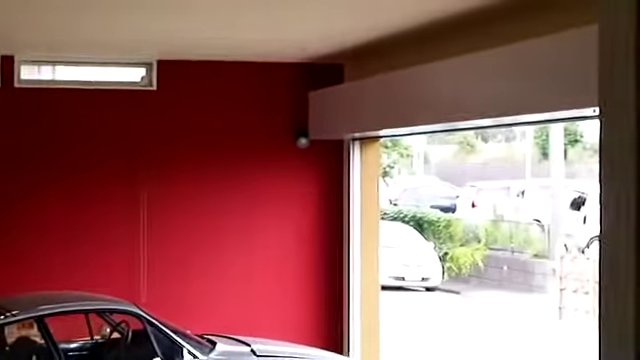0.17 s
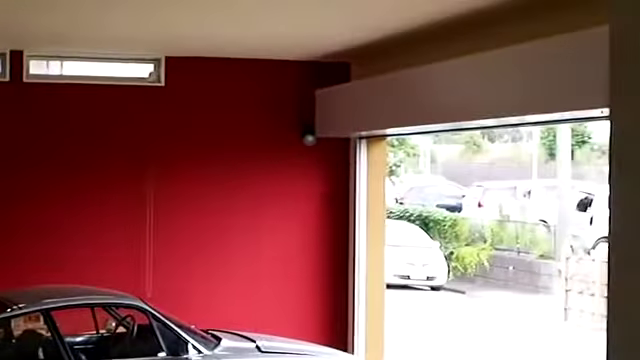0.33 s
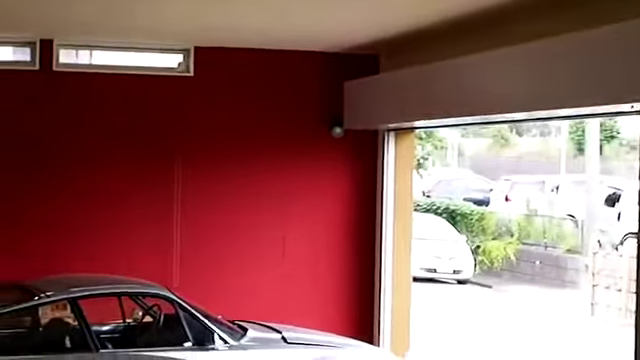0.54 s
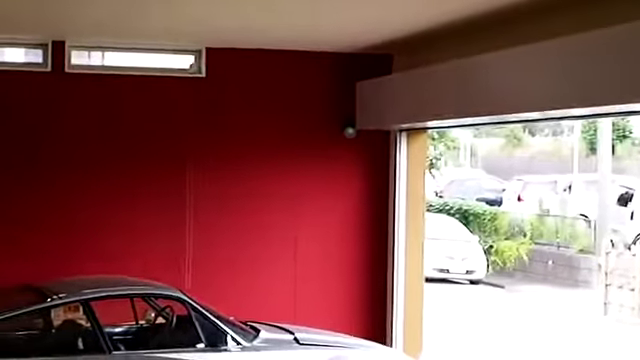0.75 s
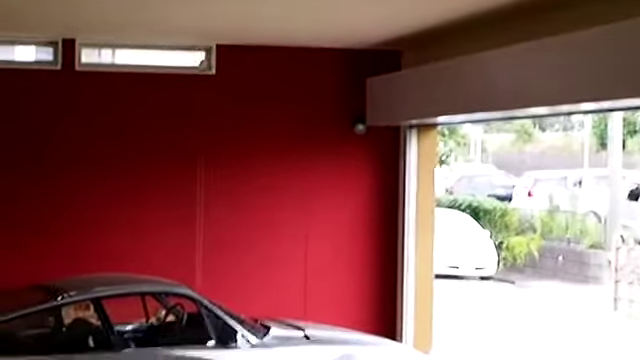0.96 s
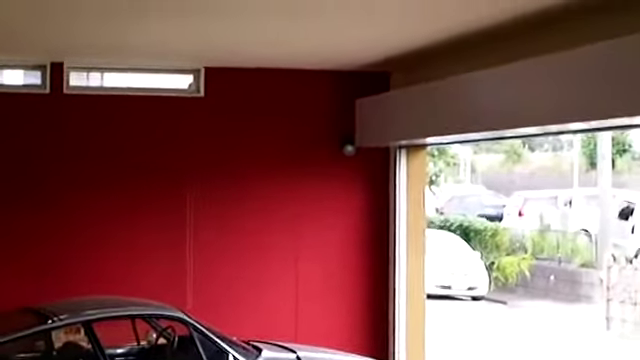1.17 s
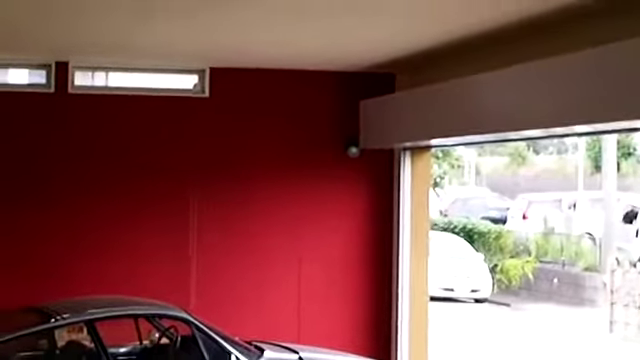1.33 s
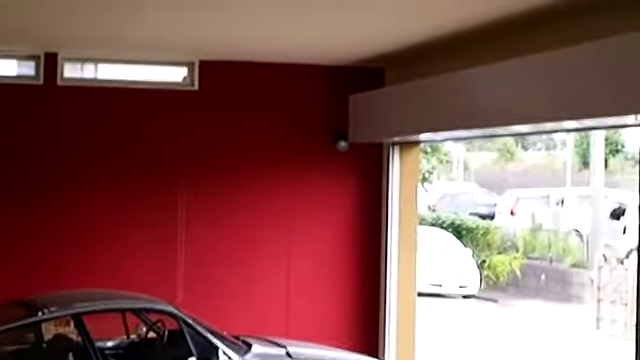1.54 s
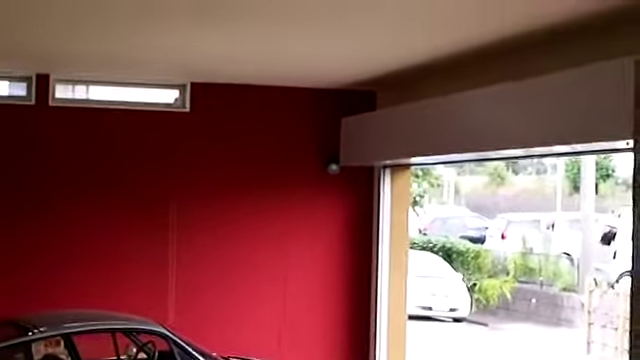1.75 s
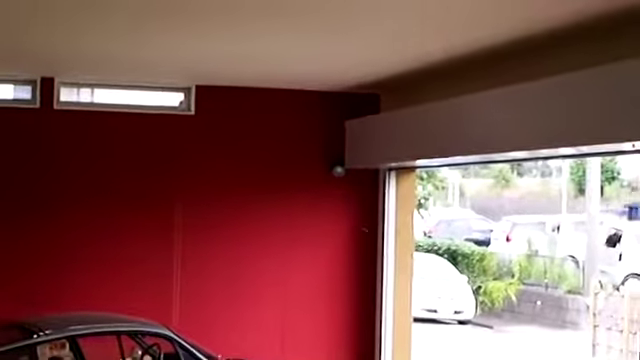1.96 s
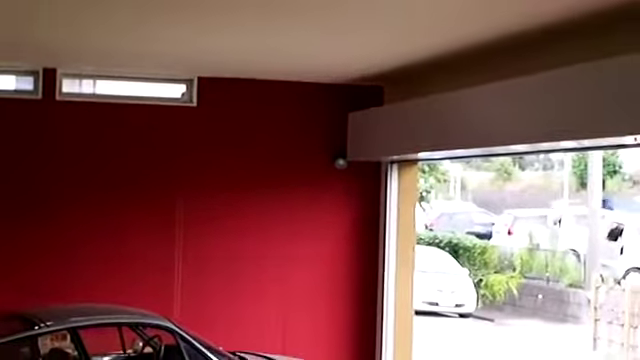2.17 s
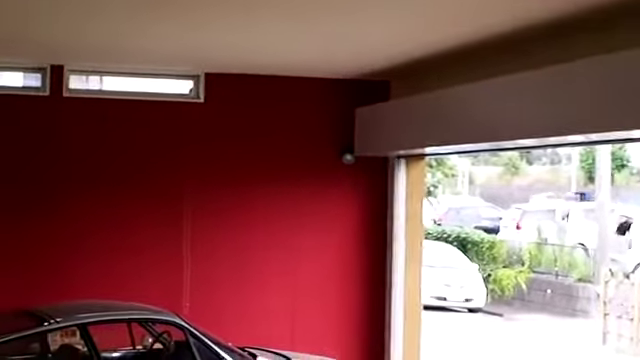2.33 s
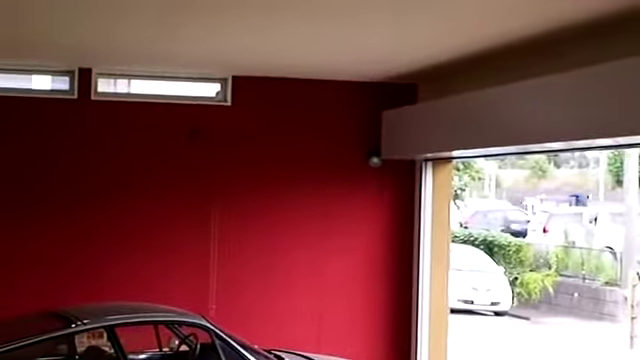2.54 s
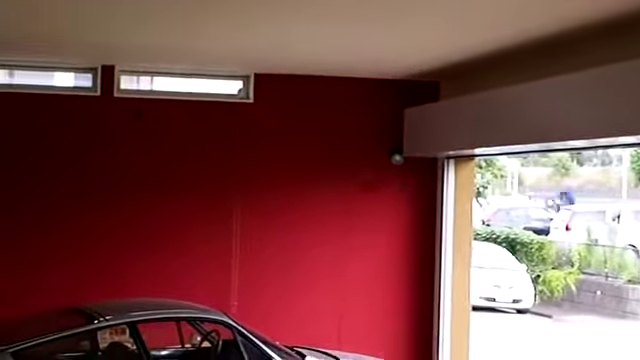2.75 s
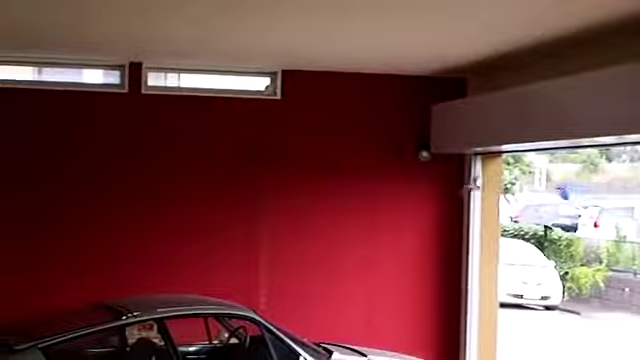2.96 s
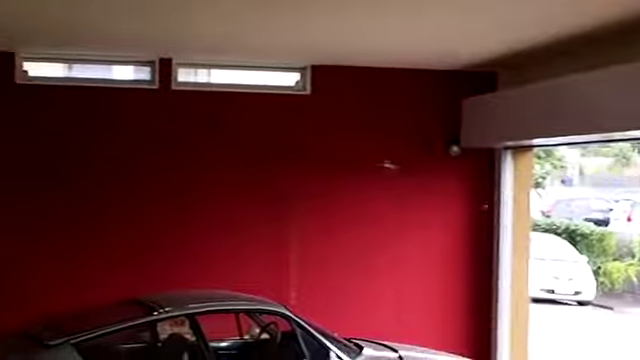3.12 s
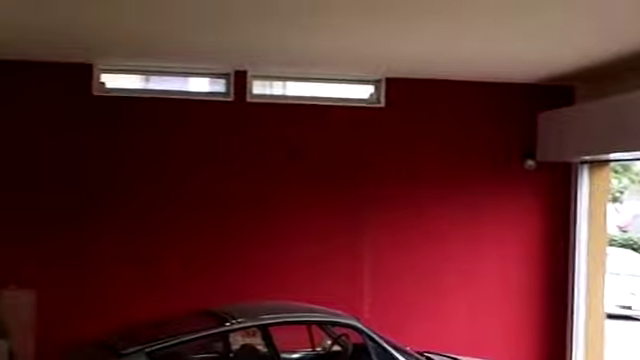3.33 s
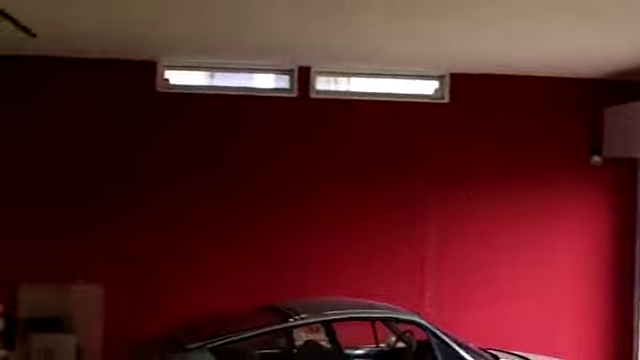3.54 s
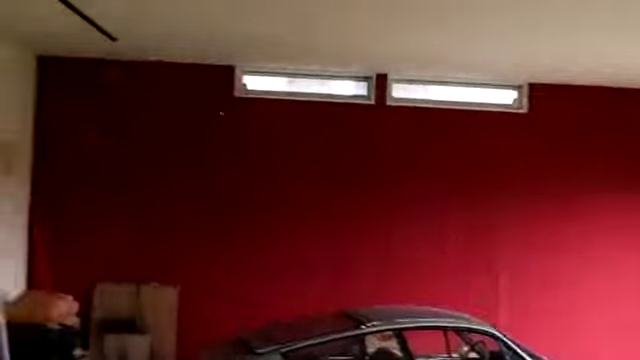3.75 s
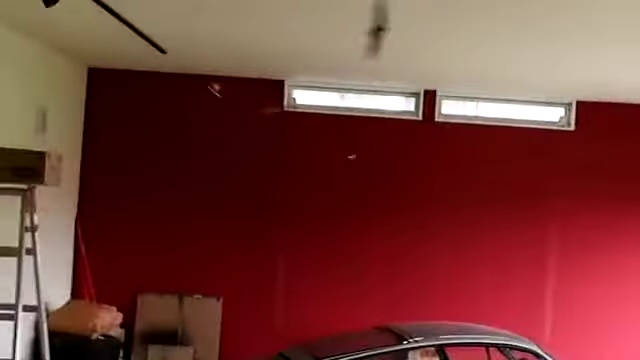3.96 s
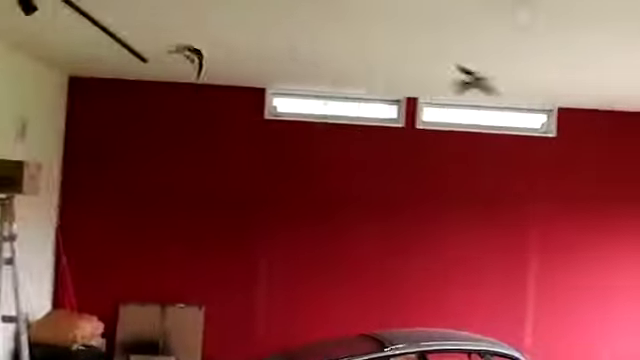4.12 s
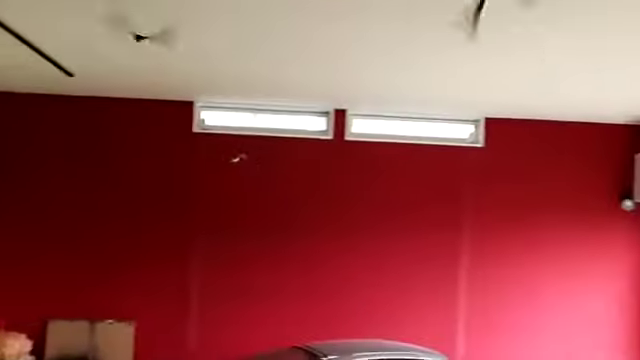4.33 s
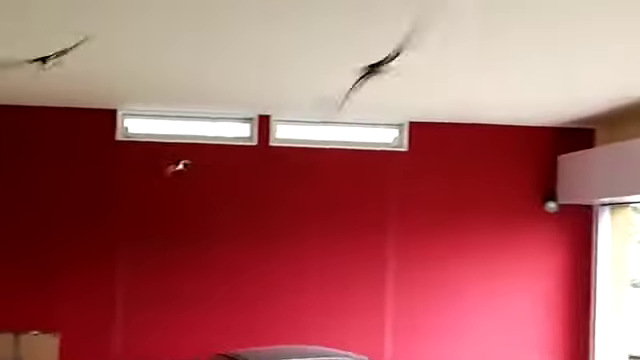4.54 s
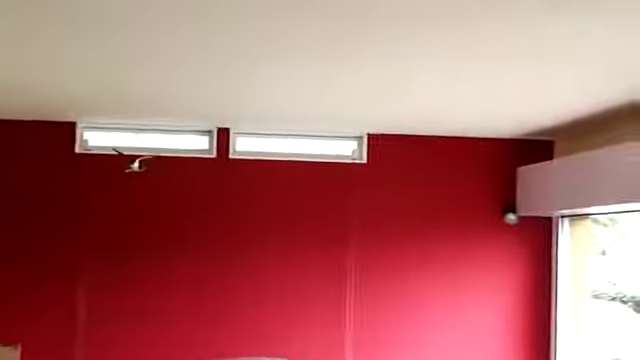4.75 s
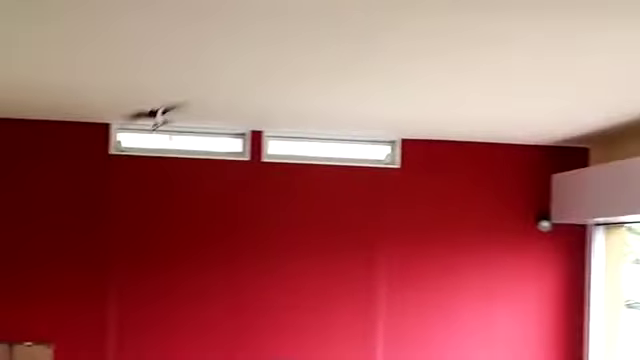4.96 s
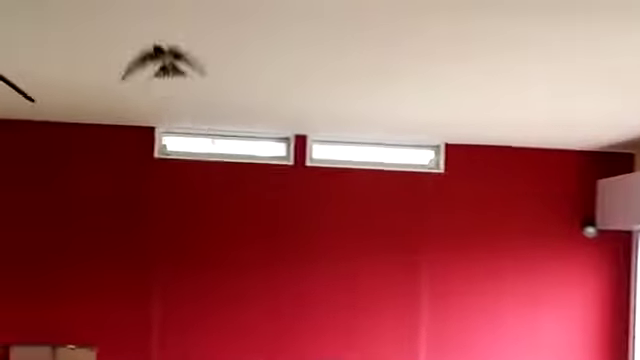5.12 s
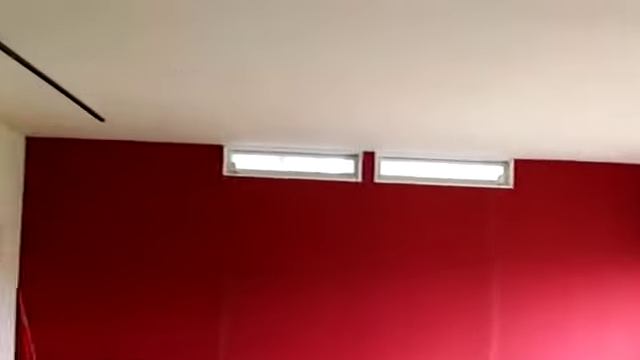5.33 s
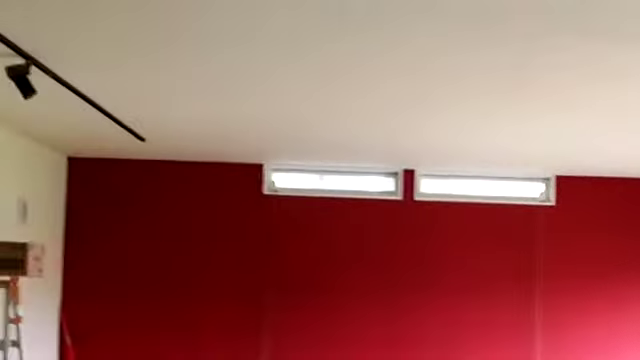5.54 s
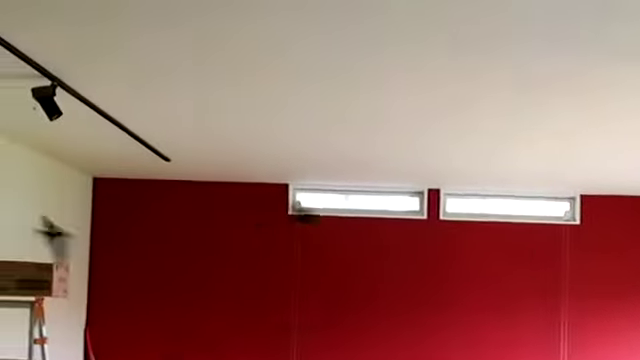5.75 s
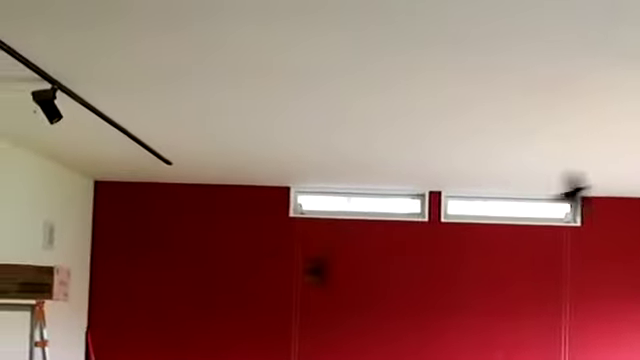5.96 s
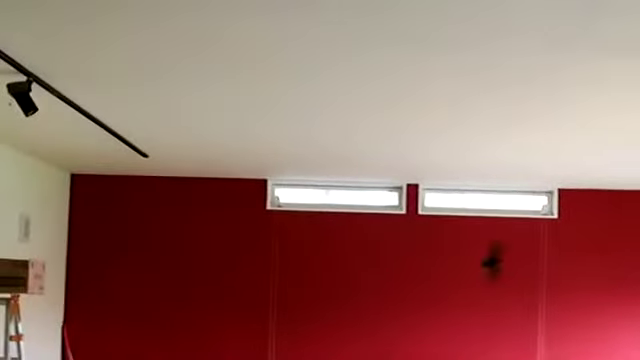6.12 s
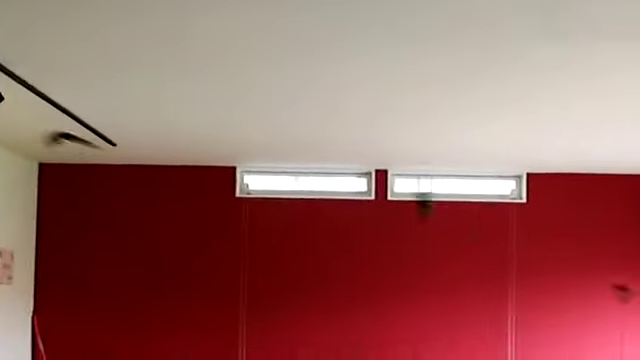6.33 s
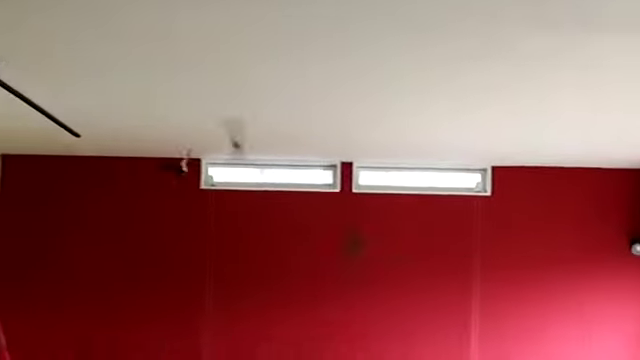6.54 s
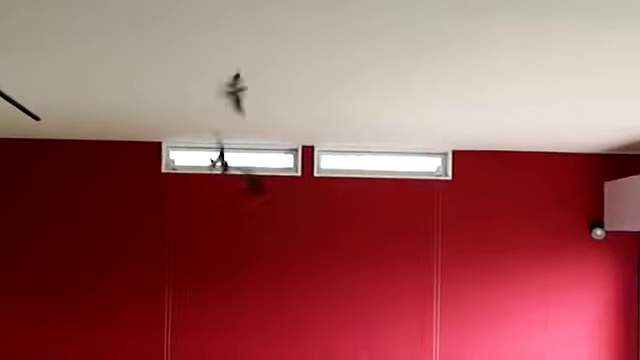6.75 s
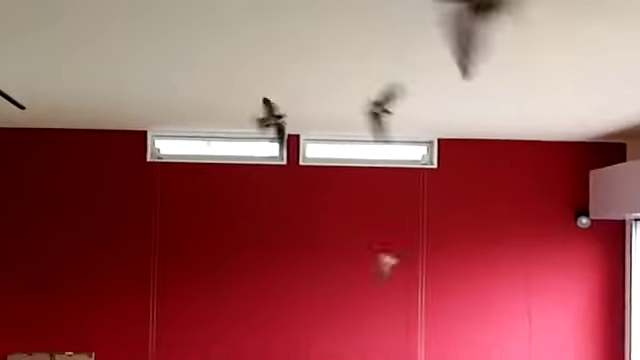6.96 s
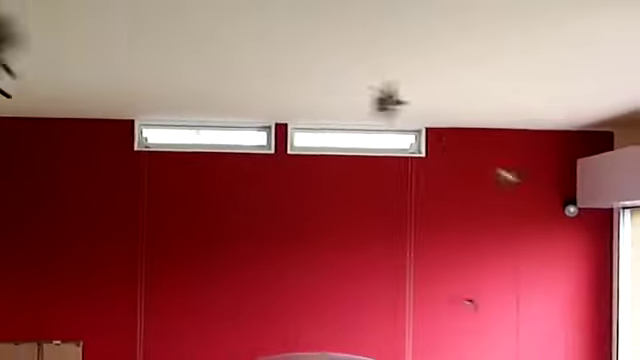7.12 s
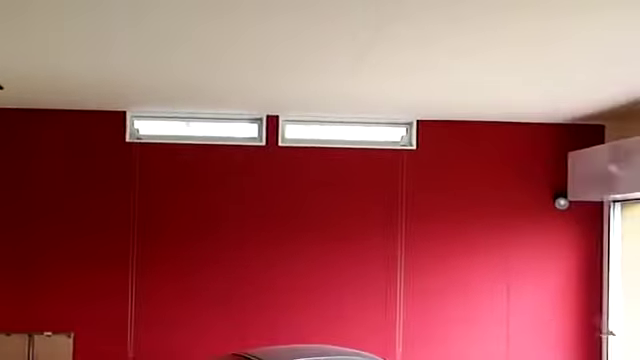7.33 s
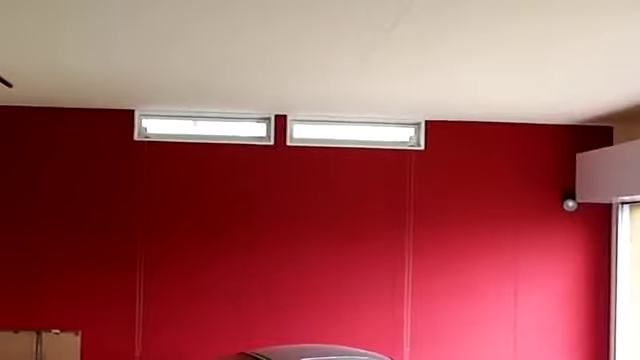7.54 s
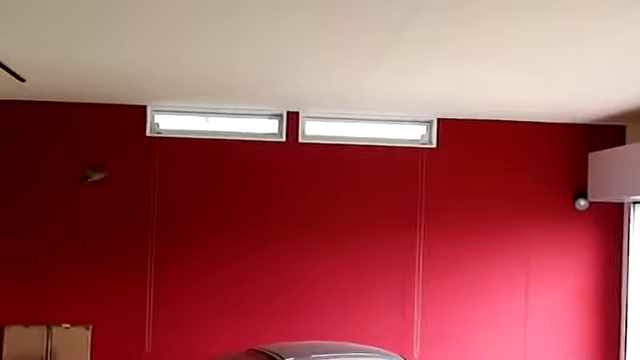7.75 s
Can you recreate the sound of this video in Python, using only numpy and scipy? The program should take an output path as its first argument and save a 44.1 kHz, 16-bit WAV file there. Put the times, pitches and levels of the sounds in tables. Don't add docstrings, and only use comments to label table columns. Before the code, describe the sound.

Swallows twitter in a bare, echoing garage, faint chirps building to piercing whistles over soft street rumble and an idling engine outside.

```python
import sys
import numpy as np
from scipy import signal
from scipy.fft import rfft, irfft, next_fast_len
from scipy.io import wavfile
from scipy.ndimage import uniform_filter1d

SR = 44100
rng = np.random.default_rng(int(sys.argv[2]) if len(sys.argv) > 2 else 0)


def invert_db(level):
    return 10 ** (np.asarray(level, dtype=float) / 20)


def output_pcm(signal):
    pcm = np.clip(np.atleast_2d(signal).T, -1, 1) * 32767
    wavfile.write(sys.argv[1], SR, np.round(pcm).astype(np.int16))


N = 343524

# share of length [0-1], share of rise [0-1], level_db
FLICK_GLIDE = [(0, 0, -6), (.33, .5, -1), (.66, .9, 0), (1, 1, -15)]


def swallows():
    return chirps() + slurs() + cries() + whistles()


def chirps():
    # start_s, length_s, first_pitch_hz, top_pitch_hz, level_db
    chirp_calls = [(0.0, 0.013, 3310, 4310, -37.5), (0.43, 0.065, 3040, 4240, -43),
                   (1.875, 0.047, 3115, 4760, -37.5), (2.365, .045, 3240, 4710, -34.5),
                   (3.035, 0.058, 3060, 4580, -30), (3.33, .06, 2846, 4233, -28),
                   (3.59, 0.06, 2980, 4635, -21.5), (4.608, .056, 2837, 4330, -24.5),
                   (5.07, .05, 3030, 4640, -24.5), (5.225, 0.049, 3037, 4464, -20.5),
                   (5.775, 0.051, 3046, 4620, -22.5), (6.15, 0.068, 3260, 4700, -23.5),
                   (6.65, 0.028, 3880, 4290, -35.5)]
    # start_s, length_s, first_pitch_hz, top_pitch_hz, level_db
    flick_calls = [
        (3.687, 0.023, 4570, 5510, -18),
        (7.132, 0.0346, 3850, 4520, -22.5),
    ]
    # share of length [0-1], share of rise [0-1], level_db
    chirp_glide = [(0, 0, -13), (.38, .45, -3), (.75, .93, 0), (1, 1, -14)]
    # wobble [1/500 of pitch], step below [dB], step above [dB], rasp_db
    chirp_voice = (4.5, -1.5, -13, -17.5)
    flick_voice = (5, -14, -13.5, -10)
    notes = placed(chirp_voice, calls(chirp_calls, chirp_glide))
    notes += placed(flick_voice, calls(flick_calls, FLICK_GLIDE))
    return sing(notes, order=3, low_voice=1.06)


def slurs():
    # start_s, length_s, first_pitch_hz, top_pitch_hz, level_db
    slur_calls = [(1.11, 0.058, 3615, 5540, -36), (1.99, 0.11, 3122, 5870, -31),
                  (2.495, 0.085, 3060, 5640, -26.5), (3.09, 0.077, 3300, 5554, -25),
                  (3.752, 0.1, 3000, 5504, -23), (4.16, 0.048, 4290, 6020, -22),
                  (4.755, .087, 4247, 5890, -25.5), (7.59, 0.088, 3350, 5590, -21)]
    # start_s, length_s, first_pitch_hz, top_pitch_hz, level_db
    snap_calls = [
        (4.361, 0.026, 4050, 5110, -23.5),
    ]
    # start_s, length_s, first_pitch_hz, top_pitch_hz, level_db
    far_calls = [
        (1.5, .15, 3805, 3840, -53.5),
        (1.72, 0.15, 3900, 4990, -55),
    ]
    # share of length [0-1], share of rise [0-1], level_db
    slur_glide = [(0, 0, -17), (.42, .33, -6), (.68, .52, -3), (.82, .95, 0), (1, 1, -5)]
    # wobble [1/500 of pitch], step below [dB], step above [dB], rasp_db
    slur_voice = (3, -7, -6, -13)
    far_voice = (15, 0, -3, 0)
    notes = placed(slur_voice, calls(slur_calls, slur_glide) + calls(snap_calls, FLICK_GLIDE))
    notes += placed(far_voice, calls(far_calls, FLICK_GLIDE))
    return sing(notes, order=4)


def cries():
    # time_s, pitch_hz, level_db
    cry_tracks = [
        [(4.055, 3450, -41.5), (4.09, 3576, -36.5), (4.13, 3923, -28.5), (4.16, 4047, -28.5), (4.19, 4530, -35)],
        [(4.322, 4100, -29), (4.345, 4404, -29.5), (4.362, 4720, -29.5), (4.368, 4600, -49)],
    ]
    # wobble [1/500 of pitch], step below [dB], step above [dB], rasp_db
    cry_voice = (3, -12, -1, -9)
    return sing(placed(cry_voice, cry_tracks), order=2)


def whistles():
    # time_s, pitch_hz, level_db
    whistle_tracks = [
        [(5.415, 3950, -22.5), (5.427, 5200, -9), (5.44, 5470, -17), (5.465, 5260, -19), (5.48, 5780, -10),
         (5.497, 5930, -17.5), (5.512, 5690, -29), (5.527, 4440, -17)],
        [(6.2, 4484, -12), (6.215, 4980, -13), (6.24, 5200, -16.5), (6.27, 5320, -20), (6.32, 5950, -17),
         (6.335, 6130, -30)],
        [(6.79, 3560, -25.5), (6.81, 4540, -19.5), (6.835, 4975, -17), (6.86, 5250, -11.5), (6.872, 5970, -19),
         (6.882, 5800, -25)],
        [(7.172, 4380, -16), (7.2, 5580, -13), (7.225, 5280, -16), (7.25, 5753, -6), (7.265, 5265, -14),
         (7.29, 3820, -14)],
    ]
    # start_s, length_s, first_pitch_hz, top_pitch_hz, level_db
    pip_calls = [
        (5.312, 0.046, 4050, 5630, -15.5),
        (6.168, 0.018, 5290, 5533, -7.5),
        (6.77, 0.0365, 3834, 5430, -13.5),
    ]
    # start_s, length_s, first_pitch_hz, top_pitch_hz, level_db
    high_calls = [
        (6.068, 0.037, 5770, 7530, -19),
        (6.68, .038, 5740, 6990, -14.5),
    ]
    low_calls = [
        (6.072, .03, 3060, 5370, -24),
        (6.675, .038, 3180, 4920, -26),
    ]
    # share of length [0-1], share of rise [0 first pitch, 1 top pitch, negative lower still], level_db
    pip_glide = [(0, 0, 1), (0.172, 0.77, -5.5), (.45, 1, 0), (1, 0.99, -39)]
    high_glide = [(0, -0.022, 3.5), (.27, 0.83, -13), (.58, 0.88, -21), (.82, .4, -10), (1, -0.48, 13.5)]
    low_glide = [(0, 1, -2), (.48, 0.81, -3.5), (.76, .55, -3), (1, 0, -1)]
    # wobble [1/500 of pitch], step below [dB], step above [dB], rasp_db
    pip_voice = (2, 0, -28, -22)
    whistle_voice = (4.5, 0, -24, -20)
    pips = calls(pip_calls, pip_glide) + calls(high_calls, high_glide) + calls(low_calls, low_glide)
    return sing(placed(pip_voice, pips) + placed(whistle_voice, whistle_tracks), order=1)


def calls(rows, glide):
    share, rise, db = np.transpose(glide)
    return [np.transpose([s + share * length_s, first_hz + rise * (top_hz - first_hz), level_db + db])
            for s, length_s, first_hz, top_hz, level_db in rows]


def placed(voice, tracks):
    # time_s, left minus right [dB], direct over room [dB], extra rasp [dB]
    flight = [(.3, 4, -3, -2), (1.2, 1, -7, -1), (2.0, 3, 1, -2), (2.5, 4, -2, -3), (3.1, 3, -1, 0),
              (3.35, 1, -1, -10), (3.6, 5, -4, 1), (3.75, 3, 2, -2), (4.2, 4, 2, 0), (4.6, 4.5, 5, -2),
              (4.8, 4, 1, 2), (5.1, 7, -6, -2), (5.45, 2, -3, 0), (5.8, 9, -7, -1), (6.2, 3, -2, 1),
              (6.8, 8, -5, -3), (7.2, 6, -2, 2), (7.6, 5, -2, -3)]
    s, pan_db, near_db, rasp_db = np.transpose(flight)
    wobble, below_db, above_db, voice_rasp_db = voice
    notes = []
    for track in tracks:
        pan, near, rasp = (np.interp(track[0][0], s, curve) for curve in (pan_db, near_db, rasp_db))
        notes.append(((wobble, below_db, above_db, voice_rasp_db + rasp), pan, near, track))
    return notes


def sing(notes, order, low_voice=1, room_pan_db=1.3):
    direct, wet = np.zeros((2, N)), np.zeros((2, N + 2 * SR))
    for (voice, pan_db, near_db, track), room in zip(notes, garage(count=len(notes))):
        at, x = note(voice, track, order, low_voice)
        ring = signal.fftconvolve(x[None], room, axes=1)
        wet[:, at:at + ring.shape[1]] += ring
        direct[:, at:at + len(x)] += x * invert_db(near_db + np.array([[pan_db], [-pan_db]]) / 2)
    direct = shape(direct, [(5000, 0.0), (10000, -3.0)])
    return direct + wet[:, :N] * invert_db(np.array([[room_pan_db], [-room_pan_db]]) / 2)


def note(voice, track, order, low_voice, shake_rad=0.98, flutter_db=3.2, fall=0.43):
    # frequency_hz, gain_db
    beak_colour = [(1500, -29), (2200, -16.5), (2700, -0.5), (4000, -1.5), (6000, 0.5), (8000, -3.5),
                   (11000, -14), (15000, -3)]
    # frequency_hz, gain_db
    air_colour = [(1800, -40), (2500, -8), (4500, -5), (6200, 5), (7500, 0), (11000, 2), (15000, 0)]
    wobble, below_db, above_db, rasp_db = voice
    s, hz, db = np.transpose(track)
    t = np.arange(int(s[0] * SR), int(s[-1] * SR)) / SR
    drift, shake, flutter = (walk(rate, size=SR // 6)[:len(t)] for rate in (200., 900., 150.))
    air = rng.standard_normal(SR // 6)[:len(t)]

    smooth_hz = uniform_filter1d(np.interp(t, s, hz), 200)
    pitch = smooth_hz / order * (1 + wobble / 500 * drift)
    phase = 2 * np.pi * np.cumsum(pitch) / SR + shake_rad * invert_db(rasp_db) * shake

    k = np.arange(1, 3 * order + 2)[:, None]
    step_db = np.where(k < order, below_db * (order - k), above_db * np.abs(k - order) ** fall)
    k = np.where(k < order, low_voice, 1) * k
    beak_hz, gain_db = np.transpose(beak_colour)
    beak_db = np.interp(np.log(k * pitch), np.log(beak_hz), gain_db)
    partials = invert_db(step_db + beak_db) * (k * pitch < 16000) * np.sin(k * phase)
    tone = np.sqrt(2) * np.sum(partials, axis=0)

    rasp = invert_db(rasp_db) * shape(air * (1 + np.cos(phase)), air_colour)
    rasp *= np.clip((t - t[0]) / 0.03, 0, 1)
    edge = np.clip(np.minimum(t - t[0], t[-1] - t) / .005, 0, 1)
    return int(s[0] * SR), (tone + rasp) * edge * invert_db(np.interp(t, s, db) + flutter_db * flutter)


def garage(count, onset_s=0.0039, echo_db=-12):
    # frequency_hz, t60_s
    decay_times = [(2500, 0.91), (5000, 0.79), (8000, 0.66), (12000, 0.52)]
    # delay_s, level_db, left minus right [dB]
    wall_echoes = [
        (0.009, -8, -32),
        (.024, -33, 13),
        (.037, -13, 3),
    ]
    t = np.arange(SR) / SR
    centres = 2000 * 2 ** np.arange(0, 3.1, .5)
    bands = []
    for hz in centres:
        edges = [hz / 2 ** .25, min(hz * 2 ** .25, 20000)]
        sos = signal.butter(2, edges, "band", fs=SR, output="sos")
        bands.append(signal.sosfilt(sos, rng.standard_normal((2, 2 * SR))))
    bands = np.array(bands)
    t60 = np.interp(centres, *np.transpose(decay_times))[:, None, None]
    fade = np.exp(-np.log(1000) * t / t60) * (1 - np.exp(-t / onset_s))
    for place in np.arange(count) * SR // count:
        tail = np.sum(bands[..., place:place + SR] * fade, axis=0)
        tail = stereo(*tail) / np.sqrt(np.sum(tail[0] ** 2))
        for s, db, pan_db in wall_echoes:
            tail[:, int(s * SR)] += invert_db(db + echo_db + np.array([pan_db, -pan_db]) / 2)
        yield tail


def ticks(decay_s=0.0012):
    # time_s, peak_db, centre_hz
    clicks = [
        (0.111, -29, 8000),
        (0.871, -27, 4120),
        (0.9, -27, 6360),
        (0.94, -36, 5000),
        (1.145, -32, 3000),
        (1.256, -34, 2760),
        (1.4, -34, 8000),
    ]
    out, t = np.zeros(N), np.arange(400) / SR
    for s, db, hz in clicks:
        ringing = signal.lfilter(*signal.iirpeak(hz, .8, SR), rng.standard_normal(len(t)))
        burst = ringing * np.exp(-t / decay_s)
        out[int(s * SR):int(s * SR) + len(t)] += invert_db(db) * burst / np.abs(burst).max()
    return out


def street():
    # time_s, fade_s, rush_rise_db, hum_rise_db
    passing_cars = [
        (0, 0.54, 1, 1.5),
        (1.75, 0.32, 1.5, 9),
        (2.7, 0.46, 2, 0),
        (4.9, 0.84, 0, -2.5),
        (6.2, 0.42, 3.5, 6),
    ]
    # time_s, firing_hz, level_db
    engine = [
        (0.0, 68, -51),
        (2.0, 62, -56),
        (2.65, 58.5, -56),
        (3.62, 58.8, -51),
        (5.2, 58.5, -51.5),
        (5.498, 62, -61),
        (7.79, 70, -69),
    ]
    # frequency_hz, density_db
    rush_colour = [(26, -47), (45, -13), (65, -17), (86, -2), (119, -4.5), (188, -3.5), (222, -4),
                   (341, -5.5), (376, -14), (514, -7), (871, -5), (1100, -9), (1600, -10), (1980, -19.5),
                   (2300, -29), (2990, -37), (5060, -120)]
    hiss_colour = [(1500, 11), (2200, 7), (3500, 3), (6000, -3.5), (8000, -5.5), (14500, -10)]
    t = np.arange(N) / SR
    rush_db, hum_db = -43, -53.5
    for s, fade_s, rush_rise_db, hum_rise_db in passing_cars:
        nearness = np.exp(-((t - s) / fade_s) ** 2)
        rush_db = rush_db + rush_rise_db * nearness
        hum_db = hum_db + hum_rise_db * nearness
    rush = unit(shape(rng.standard_normal((2, N)), rush_colour)) * invert_db(rush_db + 1.0 * walk(0.85, size=N))
    hiss = unit(shape(rng.standard_normal((2, N)), hiss_colour)) * invert_db(-46.5 + 0.69 * walk(16.0, size=N))
    hum = (band(218.0, 4.5) + .5 * band(270.4, 3.7) + .5 * band(123.7, 2.2)) * invert_db(hum_db)
    s, hz, db = np.transpose(engine)
    firing = 2 * np.pi * np.cumsum(np.interp(t, s, hz)) / SR
    drone = np.sqrt(2) * np.sin(firing) * invert_db(np.interp(t, s, db) + 1.3 * walk(15, size=N))
    tread_whine = band(890, 88) * invert_db(-56 + 1.5 * walk(1.3, size=N))
    return stereo(*(rush + hiss)) + tread_whine + drone + hum


def stereo(mid, side):
    # frequency_hz, side minus mid [dB]
    width = [(60, -23), (500, -22.5), (1000, -28.5), (1400, -10.5), (2000, -9), (4000, -3.5), (8000, 1)]
    side = shape(side, width)
    return np.array([mid + side, mid - side])


def shape(x, table):
    hz, db = np.transpose(table)
    n = next_fast_len(x.shape[-1])
    f = np.fft.rfftfreq(n, 1 / SR) + 1
    gain = invert_db(np.interp(np.log(f), np.log(hz), db))
    return irfft(rfft(x, n) * gain, n)[..., :x.shape[-1]]


def unit(x):
    return x / np.sqrt(np.mean(x ** 2))


def walk(rate, size):
    k = max(int(SR / rate), 1)
    smooth = uniform_filter1d(uniform_filter1d(rng.standard_normal(size + 2 * k), k), k)
    return unit(smooth[k:k + size])


def band(hz, width_hz):
    return unit(signal.lfilter(*signal.iirpeak(hz, hz / width_hz, SR), rng.standard_normal(N)))


def scene():
    return swallows() + street() + ticks()


def low_pass(x):
    return signal.sosfilt(signal.butter(12, 15180, fs=SR, output="sos"), x)


def record(dry):
    # start_s, hold_s, depth_db
    ducks = [
        (5.398, 0.082, -7.5),
        (6.15, 0.12, -5.5),
        (6.765, 0.067, -5),
        (7.145, 0.14, -7),
    ]
    # frequency_hz, gain_db
    mic_response = [(30, -4), (40, -10), (50, 0), (14300, 0), (14500, -60)]
    attack_s, release_s = 0.13, .17
    limit_db, limit_s = -4, .004

    haze_db = -15 + np.array([[2.0], [-2.0]])
    grit = 1 + .6 * rng.standard_normal(dry.shape)
    haze = invert_db(haze_db) * shape(np.abs(dry) * grit, [(7800, -58), (9200, -1.5), (14000, -7)])

    t = np.arange(N) / SR
    gain_db = np.zeros(N)
    for s, hold_s, depth_db in ducks:
        corners = s + np.cumsum([0, attack_s, hold_s, release_s])
        gain_db += depth_db * np.interp(t, corners, [0, 1, 1, 0])
    power = 2 * uniform_filter1d(np.mean(dry ** 2, axis=0), int(limit_s * SR))
    limiter = 1 / np.sqrt(1 + power / invert_db(2 * limit_db))
    mix = shape((dry + haze) * invert_db(gain_db) * limiter, mic_response)
    return low_pass(mix)


dry = scene()
out = record(dry)
output_pcm(out)
```